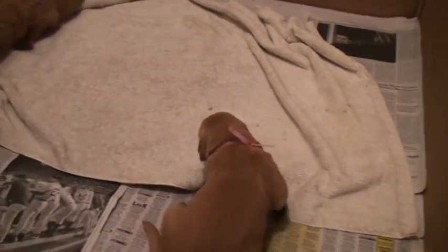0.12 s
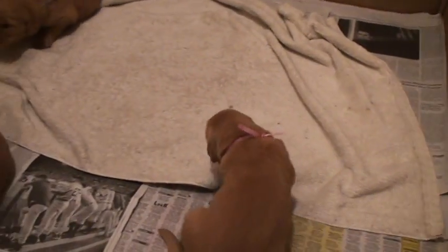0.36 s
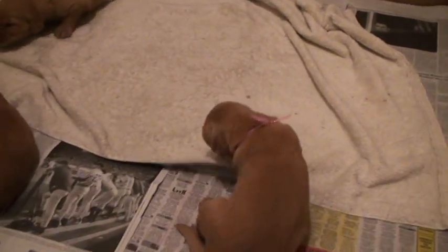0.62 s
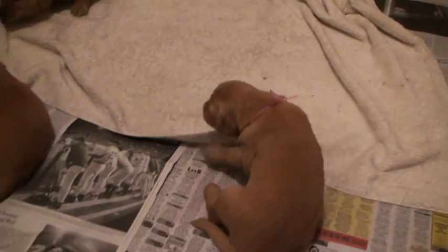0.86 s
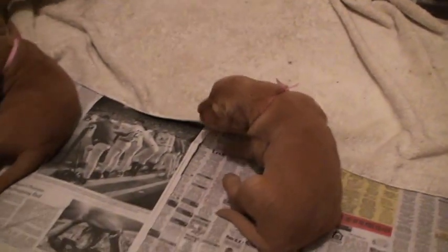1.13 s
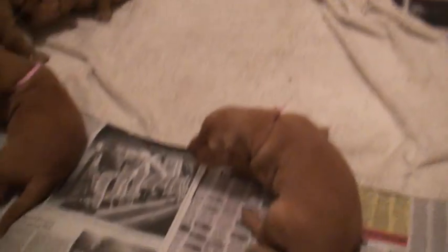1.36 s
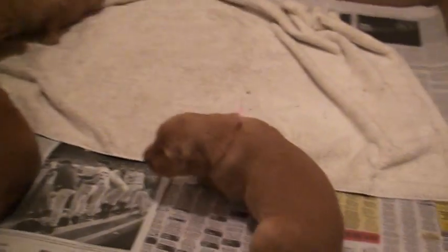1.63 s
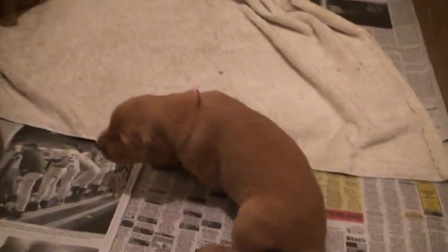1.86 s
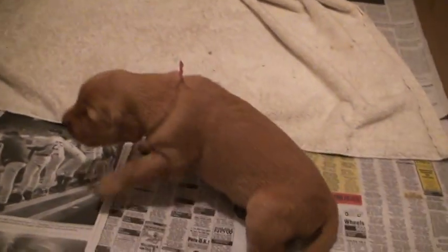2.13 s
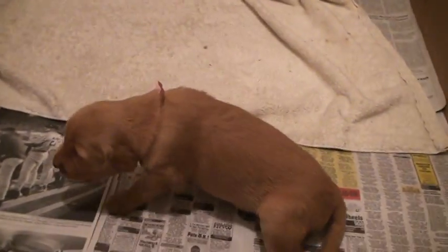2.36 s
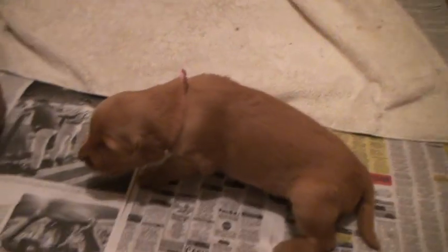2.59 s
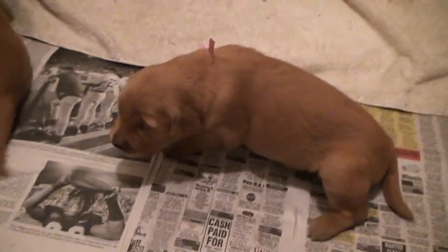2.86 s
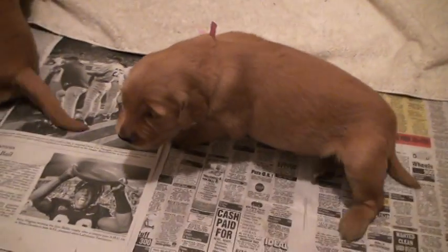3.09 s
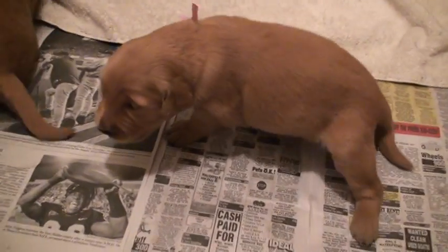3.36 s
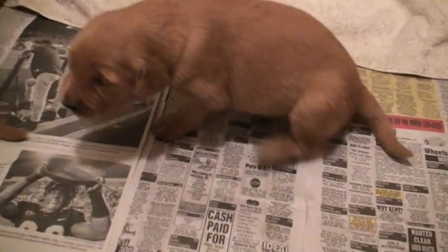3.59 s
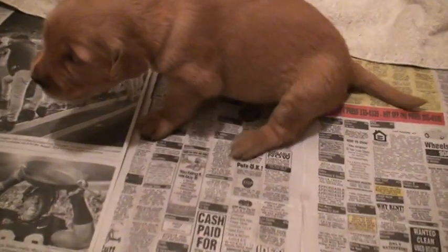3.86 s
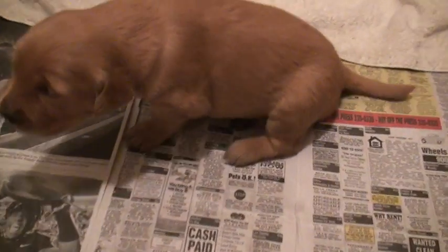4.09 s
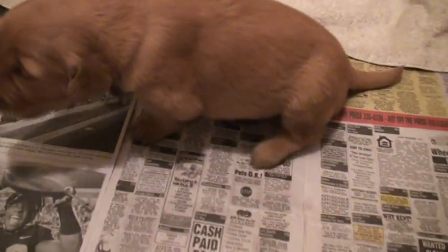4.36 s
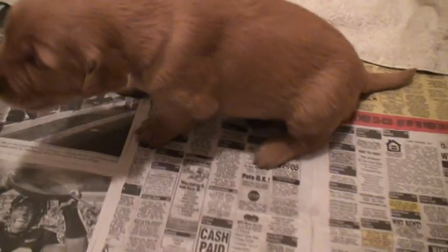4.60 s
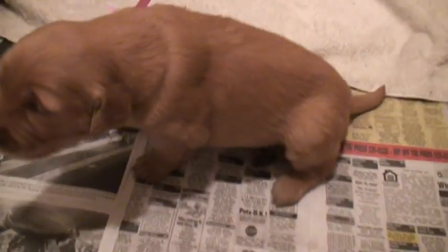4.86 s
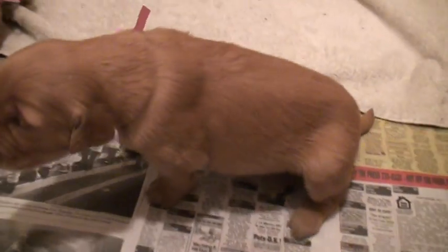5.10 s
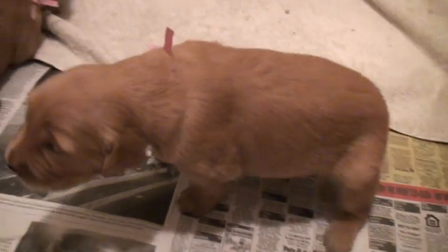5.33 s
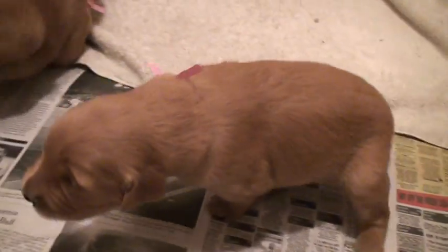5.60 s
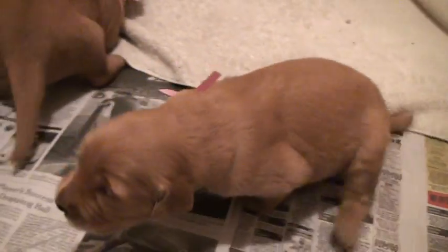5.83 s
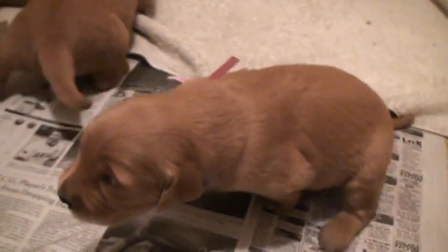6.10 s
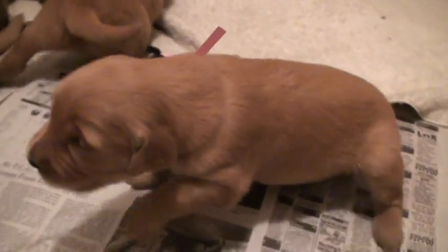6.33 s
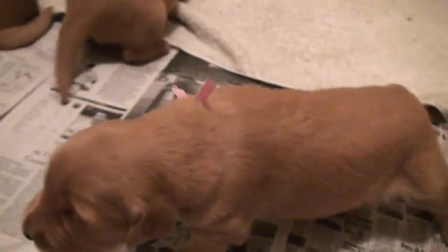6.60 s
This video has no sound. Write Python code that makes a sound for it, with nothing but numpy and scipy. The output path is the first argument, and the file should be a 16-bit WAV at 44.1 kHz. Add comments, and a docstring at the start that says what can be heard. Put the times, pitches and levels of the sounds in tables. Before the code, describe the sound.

Close in a small, quiet room, a very young puppy crawls on newspaper, giving brief, nasal, squeaky whimpers at a steady pace, roughly three a second. Paper rustles and snaps sharply at first, then drags more lightly, with soft paw thuds and tiny claw ticks. Near the end the first puppy falls silent and a littermate slightly left gives a sharp high yelp and two hoarser, falling whines. Steady microphone hiss lies underneath.

```python
"""Newborn puppy on newspaper

A newborn puppy crawls over newspaper and towel, whimpering in short arched cries, and a littermate
further left answers. The voices are stacks of overtones shaped by chest, mouth and upper throat.
Paper rustles as shaped noise and snaps as ticks with short rings; claws tick as noise bursts.
Bodies thud as decaying floor modes, and a small room rings briefly over steady hiss and a faint hum."""
import sys
import numpy as np
from scipy import signal
from scipy.io import wavfile
from scipy.ndimage import uniform_filter1d

SR = 44100
rng = np.random.default_rng(int(sys.argv[2]) if len(sys.argv) > 2 else 0)


def output_pcm(signal):
    """Save a mono or channel-first signal as 16-bit PCM at the path in sys.argv[1].

    Samples are clipped to [-1, 1] before scaling.
    """
    pcm = np.clip(np.atleast_2d(signal).T, -1, 1) * 32767
    wavfile.write(sys.argv[1], SR, np.round(pcm).astype(np.int16))


def convert_level_to_amplitude(level_db):
    """Map a level in decibels to its linear amplitude factor."""
    exponent = np.asarray(level_db, float) / 20
    return 10 ** exponent


N = 295911  # length in samples

# Background hiss spectrum: frequency_hz, relative density_db (per Hz)
HISS_SPECTRUM = [(18, -42), (30, -12), (107, -10), (197, 0), (567, -5), (800, 0), (1220, -5), (2130, -3),
                 (3090, -10), (6650, -9), (11600, -12), (16800, -22)]
# Likeness of left and right in the noises: frequency_hz, correlation (0-1)
STEREO_LIKENESS = [(30, 0.28), (200, 0.95), (700, 0.46), (2000, 0.57), (10000, 0.65)]
# Decay of the small room: frequency_hz, t60_s
ROOM_DECAY = [(200, 0.21), (600, 0.18), (2000, 0.17), (5000, 0.17), (12000, 0.085)]
# Floor modes: frequency_hz, level_db (relative), t60_s
FLOOR_MODES = [(66, -20, 0.26), (129.6, -3.5, 0.25), (184.7, 2, 0.16), (212.4, 8.5, 0.077),
               (301, 1.5, 0.099)]
# Paws and bellies landing: start_s, level_db (relative), depth_db (gain per octave below 200 Hz)
THUDS = [(0.64, -54, -5), (0.875, -54, -24), (0.95, -48.5, 0), (1.155, -53, -8), (2.001, -42, 6),
         (2.292, -53, -5), (3.208, -57, 8), (3.373, -46.5, 1), (3.892, -49.5, 7.5), (4.45, -57, 5),
         (4.753, -46, 4), (5.179, -46.5, -4), (5.45, -55, -7), (5.745, -47, 10), (5.887, -50, 6),
         (6.553, -37, 6.5)]
# Paper dragged under paws and belly: peak_s, level_db (relative), swell_s, fade_s (each over 20 dB)
PAPER_DRAGS = [(.03, -46.5, 0.066, 0.085), (.14, -41.5, 0.068, 0.14), (0.256, -42.5, 0.032, 0.16),
               (.56, -51.5, 0.3, 0.12), (0.611, -45, 0.0076, 0.062), (0.664, -43.5, 0.086, 0.15),
               (0.886, -46, 0.0075, 0.16), (1.4, -53.5, 0.18, 0.21), (1.895, -48, 0.037, 0.064),
               (2.36, -51, 0.2, 0.12), (2.71, -46, 0.079, 0.091), (2.893, -53, 0.0067, 0.066),
               (3.19, -53, 0.084, 0.63), (3.33, -52, 0.43, 0.096), (3.62, -46.5, 0.087, 0.18),
               (3.69, -47, 0.02, 0.14), (3.906, -53, 0.13, 0.038), (4.05, -48.5, 0.071, 0.15),
               (4.375, -46.5, 0.13, 0.076), (4.447, -50.5, .012, 0.05), (4.868, -46.5, 0.2, 0.065),
               (5.21, -60, 0.2, 1), (5.82, -48, 0.51, 0.2), (6.02, -50.5, 0.19, 1),
               (6.18, -46, 0.036, 0.028), (6.31, -53.5, 0.055, 0.39), (6.501, -43, 0.12, 0.12),
               (6.705, -52, 0.026, 0.13)]
# Load on the paper: time_s, weight (0 brushed, 1 creased)
PAPER_WEIGHT = [(0, 0.71), (.9, 0.7), (1.3, 0.74), (2.7, 0.12), (4.8, 0.37), (5.2, 0.42), (5.8, 0.44),
                (6.5, 0.35), (6.7, 1)]
# Colour of light brushing: frequency_hz, relative density_db (per Hz)
BRUSHING = [(88, -32), (150, 0), (669, -19.5), (798, -25.5), (1900, -22), (12300, -12), (16500, -19)]
# Colour of creasing under weight: frequency_hz, relative density_db (per Hz)
CREASING = [(88, -50), (150, 4), (371, -6), (669, -6), (847, 7), (3040, -1.5), (12500, -11.5), (16500, -26)]
# Paper snaps: start_s, level_db (relative), ring_hz, ring_db (against the level),
# wake_db (scratchy wake against the ring)
PAPER_SNAPS = [(0.026, -24.5, 3400, -11.5, -2.5), (0.111, -30, 4840, -2.5, 1.5),
               (0.1379, -22.5, 2190, -10, -8.5), (0.179, -23, 3420, -2, -9.5),
               (0.2359, -33, 2070, 4.5, -19), (0.2507, -23.5, 3160, -0.5, -15),
               (0.548, -40.5, 1830, -1.5, 0.5), (0.607, -16.5, 2050, -14, -4), (0.8855, -33, 2560, -9, 1),
               (1.8832, -37, 4140, -13, 3.5), (2.354, -25.5, 1690, -4, -13), (2.709, -21, 1580, -39, -13),
               (2.8926, -25.5, 1640, -8, -24), (3.685, -26.5, 4000, -17, 1.5),
               (5.224, -39.5, 1570, -11, 4.5), (5.7529, -34, 1450, 5, -5.5), (6.577, -20.5, 1900, -19, -1)]
# Claws ticking on the sheet: start_s, level_db (relative)
CLAW_TICKS = [(1.2028, -36), (1.2563, -42.5), (3.907, -34), (5.3434, -42), (5.3712, -54), (5.3966, -53),
              (5.8396, -37)]
# Edges of the claw noise band: low_hz, high_hz
CLAW_BAND = (1600, 4900)
# Faint nose whistles, the low ones just before a cry: start_s, length_s, pitch_hz, level_db (relative)
NOSE_WHISTLES = [(1.29, 0.021, 665, -45), (3.603, 0.024, 660, -37.5), (3.94, 0.039, 660, -39.5),
                 (4.268, 0.03, 504, -51), (5.147, 0.06, 2300, -58.5), (5.394, 0.053, 2250, -55),
                 (5.665, 0.043, 1870, -49.5)]
# Chest resonance of both animals: frequency_hz, gain_db
CHEST = [(200, -22), (350, -1), (600, 2.5), (900, 5), (1250, -9), (1500, -10.5), (2200, -108)]
# The puppy's mouth resonance: frequency_hz, gain_db
PUPPY_MOUTH = [(1100, -13.5), (1400, -3.5), (1700, 7), (2080, -2), (2550, -18.5), (3500, -33.5),
               (5000, -60)]
# The puppy's upper throat bands: frequency_hz, gain_db
PUPPY_THROAT = [(3000, -19), (3900, -22), (4700, -1.5), (5200, -3), (5600, -1.5), (6000, -5), (6500, 2),
                (7100, -8), (7500, -11.5), (8300, -10.5), (9300, -18), (10300, -30), (11200, -21),
                (12100, -26), (15000, -64)]
# The littermate's shorter mouth: frequency_hz, gain_db
MATE_MOUTH = [(1100, -16.5), (1500, -6.5), (1900, 3), (2150, -2.5), (2600, -14), (2900, -40), (3400, -29),
              (5000, -54)]
# The littermate's upper throat bands: frequency_hz, gain_db
MATE_THROAT = [(3000, -30), (4500, 2), (5200, -5), (6400, 4.5), (7000, -10), (7500, -18), (12000, -45)]
# The puppy's cries, one table each: time_s, effort_db (relative), pitch_hz
PUPPY_CRIES = [
    [(.372, -32, 408), (.378, -34.5, 410), (.398, -32.5, 436.5), (.43, -38, 412.4), (.454, -48, 428)],
    [(.665, -35, 420), (.68, -39.5, 431), (.701, -34, 416), (.717, -31.5, 423), (.761, -42.5, 441.2),
     (.773, -52, 413)],
    [(1.0, -33.5, 411), (1.028, -34, 402.6), (1.048, -29.5, 453.3), (1.1, -44, 430.6), (1.11, -52, 470)],
    [(1.298, -41, 521), (1.306, -37.5, 530), (1.326, -31, 638), (1.346, -30.5, 696.5),
     (1.404, -27.5, 576.6), (1.43, -37.5, 436)],
    [(1.614, -40.5, 479), (1.648, -35.5, 504), (1.672, -34, 517.6), (1.764, -34, 463), (1.802, -37, 431),
     (1.82, -33.5, 402)],
    [(2.014, -34.5, 392.6), (2.1, -32.5, 402.7), (2.118, -34, 450), (2.132, -30.5, 461.4),
     (2.144, -40, 430), (2.16, -52, 402)],
    [(2.373, -30, 422), (2.38, -32.5, 387), (2.392, -34.5, 460), (2.414, -37.5, 462), (2.426, -42, 433)],
    [(2.651, -25, 427), (2.659, -31, 467), (2.685, -30, 578.4), (2.715, -31.5, 553.7), (2.738, -34, 416)],
    [(2.946, -21.5, 423), (2.954, -30.5, 449), (2.984, -31, 524), (3.0, -26.5, 523), (3.022, -34, 508),
     (3.048, -35, 378)],
    [(3.247, -33.5, 406), (3.267, -31.5, 527), (3.313, -29, 544.2), (3.359, -30.5, 509), (3.399, -31, 363),
     (3.405, -23, 348)],
    [(3.616, -42.5, 500), (3.642, -34.5, 503), (3.688, -27.5, 583.4), (3.704, -32, 562),
     (3.722, -27.5, 586.3), (3.745, -44, 540)],
    [(3.952, -33, 480), (3.966, -31, 495), (3.992, -24.5, 639), (4.038, -21.5, 595.6), (4.07, -33.5, 539.6),
     (4.092, -29, 414)],
    [(4.3, -27, 345), (4.31, -33, 400), (4.326, -29.5, 494), (4.352, -29.5, 497.4), (4.378, -34, 417),
     (4.392, -53, 368)],
    [(4.604, -16.5, 389), (4.61, -37.5, 395), (4.636, -27, 513.7), (4.682, -29, 502.6), (4.724, -33.5, 416),
     (4.734, -48, 393)],
    [(4.922, -31.5, 357), (4.928, -37.5, 356), (4.956, -33, 355), (4.97, -32, 447.7), (4.994, -43, 417)],
]
# The littermate's cries, one table each: time_s, effort_db (relative), pitch_hz
MATE_CRIES = [
    [(6.042, -34, 893), (6.078, -25.5, 822), (6.095, -29.5, 975), (6.11, -19, 1121), (6.123, -28, 1125),
     (6.137, -18.5, 1103), (6.156, -28, 911), (6.178, -32, 818)],
    [(6.347, -34, 962), (6.377, -28.5, 620), (6.389, -30, 521), (6.408, -24.5, 676.6), (6.43, -31.5, 683.7),
     (6.457, -27, 682), (6.467, -60, 646)],
    [(6.659, -28, 736), (6.671, -33.5, 702), (6.699, -33.5, 497.5), (6.707, -32, 495)],
]
# Opening of each puppy cry at its highest pitch: mouth_db, throat_db (against the effort)
PUPPY_OPENING = [(-10, -16.5), (-11.5, -23), (-8.5, -16), (1, -5), (-7.5, -6.5), (-4, -13), (-8, -14),
                 (-1, -10.5), (-7.5, -12.5), (0, -9), (5.5, -14), (2.5, -10.5), (-3.5, -11), (1.5, -10.5),
                 (-1, -15)]
# Opening of each littermate cry at its highest pitch: mouth_db, throat_db (against the effort)
MATE_OPENING = [(33.4, -19.5), (5.2, -23.5), (0.82, -21.5)]
# Breathiness of each puppy cry: hoarseness (0-1)
PUPPY_HOARSENESS = [.24, .22, .22, .12, .08, .14, .2, .22, .21, .08, .07, .1, .13, .08, .13]
# Breathiness of each littermate cry: hoarseness (0-1)
MATE_HOARSENESS = [.1, .45, .45]
# How far the littermate's mouth follows pitch in each cry: jaw (ratio).
# A yelp opens with the pitch, a falling whine opens against it.
MATE_JAW = [4.2, -0.21, -0.16]


def evened(x):
    """Scales a sound to rms 1."""
    return x / np.sqrt(np.mean(x ** 2) + 1e-20)


def read(points, hz):
    """Reads a spectrum on a log-frequency axis."""
    f, value = np.transpose(points)
    return np.interp(np.log(hz + 1), np.log(f + 1), value)


def add(mix, start_s, sound, pan_db):
    """Mixes a sound in at its start, louder on the left than on the right by pan_db."""
    part = mix[:, round(start_s * SR):][:, :len(sound)]
    part += convert_level_to_amplitude([[pan_db / 2], [-pan_db / 2]]) * sound[:part.shape[1]]


def drift(length, size):
    """Smooth random motion of rms 1 that changes over about size samples."""
    smooth = uniform_filter1d(rng.standard_normal(length), size)
    return evened(uniform_filter1d(smooth, size))


def band_noise(q, centre_hz, x):
    """Passes a sound through one resonance of sharpness q."""
    return signal.lfilter(*signal.iirpeak(centre_hz, q, SR), x)


def noise(field_db, size):
    """Stereo noise from levels over (bins, frames), with frames a quarter of size apart."""
    a, b, c, d = rng.standard_normal((*field_db.shape[::-1], 4)).T
    same = np.clip(read(STEREO_LIKENESS, np.fft.rfftfreq(size, 1 / SR)), 0, 1)[:, None]
    mid = np.sqrt((1 + same) / 2) * (a + 1j * b)
    side = np.sqrt((1 - same) / 2) * (c + 1j * d)
    spectrum = np.array([mid + side, mid - side]) * convert_level_to_amplitude(field_db)
    return signal.istft(spectrum, nperseg=size, noverlap=3 * size // 4)[1][:, :N]


def hiss():
    """Room air and microphone noise are steady coloured noise, with a faint wavering hum as a sine."""
    hiss_db, hum_db, hum_hz = -54.5, -80, 69.6
    hz = np.fft.rfftfreq(2048, 1 / SR)
    steady = read(HISS_SPECTRUM, hz)[:, None] + np.zeros(N // 512 + 5)
    air = convert_level_to_amplitude(hiss_db) * evened(noise(steady, size=2048))
    hum = np.sin(2 * np.pi * hum_hz * np.arange(N) / SR)
    return air + convert_level_to_amplitude(hum_db + 5.6 * drift(N, size=4000)) * hum


def room(x):
    """Echoes are sparse taps of random sign, one in every 20 samples; each band dies at its own speed."""
    taps = np.zeros((2, SR // 2))
    at = np.arange(160, SR // 2 - 20, 20)
    at = at + rng.integers(0, 20, (2, len(at)))
    np.put_along_axis(taps, at, rng.choice([-1., 1.], at.shape), 1)
    taps[1] = 0.61 * taps[0] + 0.97 * taps[1]  # close microphone ports share part of each echo
    hz, t, z = signal.stft(taps, SR, nperseg=256)
    decay = convert_level_to_amplitude(-60 * t / read(ROOM_DECAY, hz)[:, None])
    tail = signal.istft(z * decay, SR, nperseg=256)[1]
    return signal.fftconvolve(x.mean(0)[None], tail / np.linalg.norm(tail[0]), axes=1)[:, :N]


def thuds():
    """A soft weight sets the floor's low modes going; heavy landings reach the deeper ones."""
    out, t = np.zeros((2, N)), np.arange(9000) / SR
    soft_onset = 1 - np.exp(-t / 0.0048)
    for start_s, level_db, depth_db in THUDS:
        modes = np.zeros(len(t))
        for hz, mode_db, t60_s in FLOOR_MODES:
            fall_db = mode_db + depth_db * np.log2(200 / hz) - 60 * t / t60_s
            modes += convert_level_to_amplitude(fall_db) * np.sin(2 * np.pi * hz * t)
        add(out, start_s, convert_level_to_amplitude(level_db) * modes * soft_onset, pan_db=0)
    return out


def drag_level(t):
    """Paper motion swells and fades in straight dB slopes, over a floor that is never quite silent."""
    span_db, still_db = 20, -74.5
    peak_s, peak_db, swell_s, fade_s = np.transpose(PAPER_DRAGS)[:, :, None]
    away = np.maximum((peak_s - t) / swell_s, (t - peak_s) / fade_s)
    power = convert_level_to_amplitude(2 * still_db) + convert_level_to_amplitude(2 * (peak_db - span_db * away)).sum(0)
    return 10 * np.log10(power)


def rustle():
    """Patchy noise between two colours, with fine crackles of the fibres in narrow stretches of treble."""
    hz = np.fft.rfftfreq(512, 1 / SR)
    t = (np.arange(N // 128 + 5) * 128) / SR
    level_db = drag_level(t)
    # weight turns brushing into creasing
    weight = np.clip(np.interp(t, *np.transpose(PAPER_WEIGHT)), 0, 1.5)
    crisp, heavy = (read(c, hz)[:, None] - read(c, 13500.0) for c in (BRUSHING, CREASING))
    colour_db = (1 - weight) * crisp + weight * heavy
    patches = uniform_filter1d(rng.standard_normal((len(t), 257)), size=3, axis=0)
    patches = evened(uniform_filter1d(patches, size=7, axis=1)).T
    body = 0.55 * noise(colour_db + level_db + 2.1 * patches - 16.0, size=512)
    # crackles crowd where the paper moves most, up to 200 a second in each stretch
    busy = np.interp(np.arange(N) / SR, t, convert_level_to_amplitude(level_db - level_db.max()))
    for centre_hz in np.geomspace(2000, 12000, 6):
        strength = convert_level_to_amplitude(3.12 * np.minimum(rng.exponential(1, N), 4))
        struck = rng.random(N) < 200 * busy / SR
        flick = signal.lfilter([1], [1, -np.exp(-1 / (0.00094 * SR))], strength * struck)
        body = body + 0.92 * flick * band_noise(2, centre_hz, body)
    return body


def snaps():
    """A crease gives way: a bright tick, a short ring of the sheet and a lumpy, scratchy wake."""
    out, t = np.zeros((2, N)), np.arange(5000) / SR
    treble = signal.butter(1, [5000, 13000], "band", fs=SR)
    for start_s, level_db, ring_hz, ring_db, wake_db in PAPER_SNAPS:
        grit = rng.standard_normal((3, len(t)))
        tick_fall = convert_level_to_amplitude(-60 * t / 0.008) + convert_level_to_amplitude(-9.5 - 60 * t / 0.19)  # a sharp drop and a longer tail
        tick = 0.35 * signal.lfilter(*treble, grit[0]) * tick_fall
        ring = evened(band_noise(2.5, ring_hz, grit[1])) * convert_level_to_amplitude(-60 * t / 0.021)
        scratch_band = signal.butter(2, [280, 1.5 * ring_hz], "band", fs=SR)
        scratch = evened(signal.lfilter(*scratch_band, grit[2]))
        lumps = convert_level_to_amplitude(wake_db - 60 * t / 0.19 + 2.13 * drift(len(t), size=60))
        wake = lumps * scratch * (1 - np.exp(-t / 0.0032))
        snap = convert_level_to_amplitude(level_db) * (tick + convert_level_to_amplitude(ring_db) * (ring + wake))
        add(out, start_s, snap, pan_db=rng.normal(0, 2.2))
    return out


def claws():
    """Claws on the sheet give tiny dry ticks: band-limited noise that dies in a few milliseconds."""
    t60_s = 0.006
    out, t = np.zeros((2, N)), np.arange(600) / SR
    band = signal.butter(2, CLAW_BAND, "band", fs=SR)
    for start_s, level_db in CLAW_TICKS:
        grit = evened(signal.lfilter(*band, rng.standard_normal(len(t))))
        add(out, start_s, convert_level_to_amplitude(level_db - 60 * t / t60_s) * grit, pan_db=0)
    return out


def whistles(out):
    """Breath through the nose adds faint whistles: noise through one sharp resonance."""
    for start_s, length_s, hz, level_db in NOSE_WHISTLES:
        air = band_noise(12.0, hz, rng.standard_normal(4000))
        air = evened(air[:round(length_s * SR)])
        add(out, start_s, convert_level_to_amplitude(level_db) * air * signal.windows.tukey(len(air), .6), pan_db=3)


def cry(rows, opening, hoarse, jaw, mouth, throat, throat_db_per_octave, flutter_db):
    """Overtones of the vocal folds take their strength from chest, mouth and upper throat."""
    time_s, *columns = np.transpose(rows)
    t = np.arange(time_s[0], time_s[-1], 1 / SR)
    effort_db, hz = (np.interp(t, time_s, c) for c in columns)
    # the jaw moves with the pitch and closes late, so the voice is darker early in the cry
    below = np.log2(hz / hz.max())  # octaves from the highest pitch
    late = np.linspace(-1, 1, len(t))
    mouth_db = opening[0] + jaw * 20.5 * below + 1 * late  # 20.5 dB per octave at jaw 1
    throat_db = opening[1] + throat_db_per_octave * below + 3.5 * late
    # slack folds leak air at the start and more at the end
    leak = hoarse * (1 + 4 * np.linspace(-.8, 1, len(t)) ** 4)
    hz = uniform_filter1d(hz, size=500) * (1 + .03 * leak * drift(len(t), size=90))
    turns = 2 * np.pi * np.cumsum(hz) / SR
    parts, powers = np.zeros((2, 3, len(t)))  # rows: chest, mouth, throat
    for k in range(1, 29):
        wobble = convert_level_to_amplitude(flutter_db * (1.5 + k / 9) * drift(len(t), size=400))  # high overtones vary most
        # air leaking past the folds blurs each overtone, the high ones most
        blur = leak * (min(k, 11) - .5) / 2.6
        angle = k * turns + 2 * np.pi * rng.random()
        fuzz = drift(len(t), size=70) * np.cos(angle) + drift(len(t), size=70) * np.sin(angle)
        tone = wobble * (np.cos(angle) + blur * fuzz) / np.sqrt(1 + 2 * blur ** 2)
        gains = convert_level_to_amplitude([read(CHEST, k * hz), read(mouth, k * hz) + mouth_db, read(throat, k * hz)])
        gains = gains * (k * hz < 16000)
        gains[0] *= convert_level_to_amplitude(0.5 * (effort_db + 32.5) * (k == 1))  # hard pushes favour the fundamental
        parts = parts + gains * tone
        powers = powers + gains ** 2 / 2
    low_voice = (parts[0] + parts[1]) / np.sqrt(powers[0] + powers[1])
    voice = low_voice + convert_level_to_amplitude(throat_db) * parts[2] / np.sqrt(powers[2])
    return time_s[0], convert_level_to_amplitude(effort_db) * voice * signal.windows.tukey(len(t), .08)


def puppies():
    """The crawling puppy sits near the middle, its littermate further left with a shorter mouth."""
    out = np.zeros((2, N))
    for call in zip(PUPPY_CRIES, PUPPY_OPENING, PUPPY_HOARSENESS):
        sound = cry(*call, jaw=0.91, mouth=PUPPY_MOUTH, throat=PUPPY_THROAT,
                    throat_db_per_octave=23.5, flutter_db=1.28)
        add(out, *sound, pan_db=2.5)
    for call in zip(MATE_CRIES, MATE_OPENING, MATE_HOARSENESS, MATE_JAW):
        sound = cry(*call, mouth=MATE_MOUTH, throat=MATE_THROAT,
                    throat_db_per_octave=-3, flutter_db=2.0)
        add(out, *sound, pan_db=4.5)
    whistles(out)
    return out


def scene():
    """Voices and snaps ring in the room over rustle and hiss; small sources radiate no deep bass."""
    low, clicks, voices = thuds(), snaps() + claws(), puppies()
    echoes = room(convert_level_to_amplitude(-6.5) * voices + convert_level_to_amplitude(-8.5) * (clicks + low))
    small = convert_level_to_amplitude(-0.56) * voices + clicks + echoes + rustle()
    return signal.lfilter(*signal.butter(2, 200, "high", fs=SR), small) + low + hiss()


def roll_off(x):
    """The treble ends steeply here."""
    return signal.sosfilt(signal.butter(12, 17380, fs=SR, output="sos"), x)


def record(dry):
    """Narrows the stereo picture, most of all above 11.3 kHz, and cuts the treble at 16.6 kHz."""
    mid, side = dry.mean(0), (dry[0] - dry[1]) / 2
    low_side = signal.oaconvolve(side, signal.firwin(255, 11300, fs=SR), "same")
    side = 0.19 * side + 0.63 * low_side
    pair = np.array([mid + side, mid - side])
    edge = signal.firwin(511, 16600, window=("kaiser", 9), fs=SR)
    mix = signal.oaconvolve(pair, edge[None], "same")
    return roll_off(mix)


dry = scene()
out = record(dry)
output_pcm(out)
```